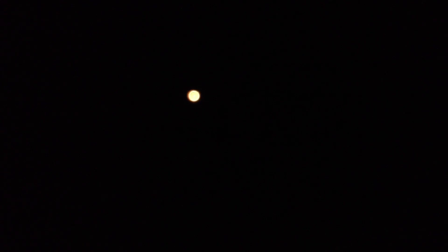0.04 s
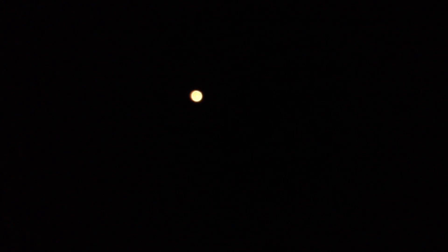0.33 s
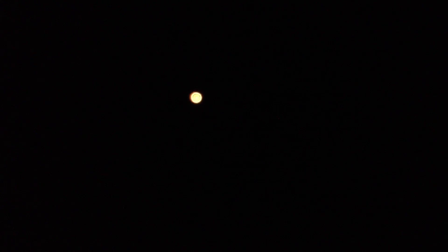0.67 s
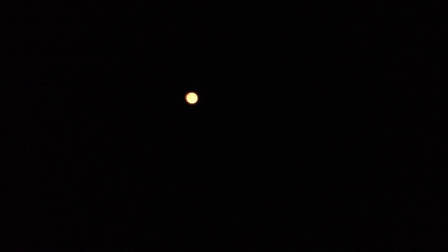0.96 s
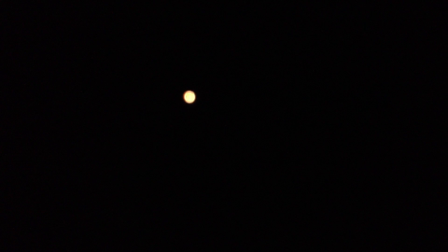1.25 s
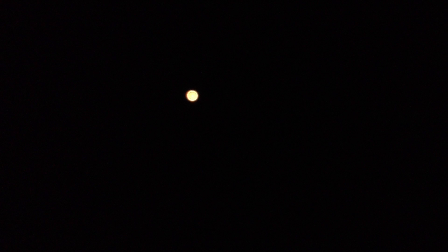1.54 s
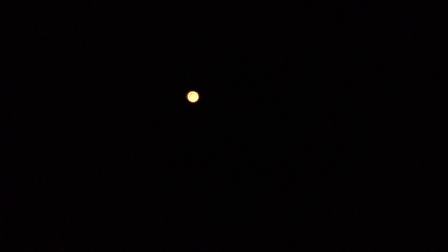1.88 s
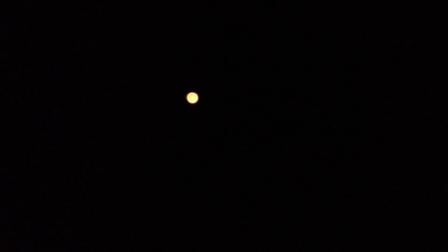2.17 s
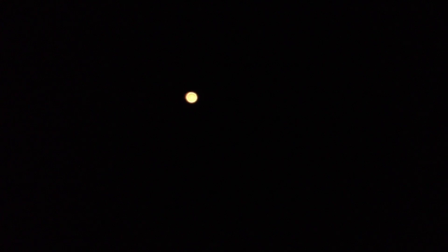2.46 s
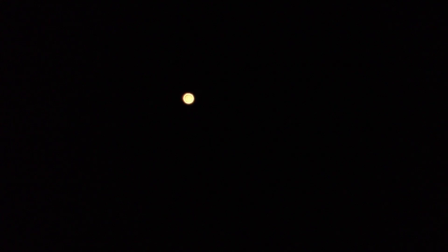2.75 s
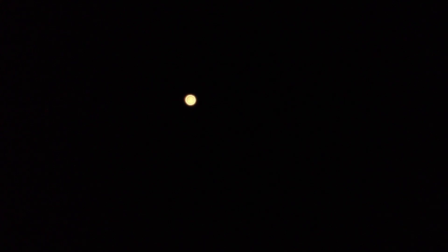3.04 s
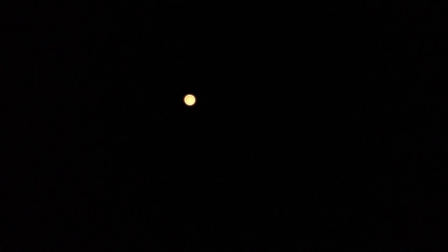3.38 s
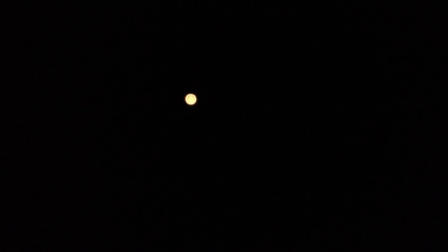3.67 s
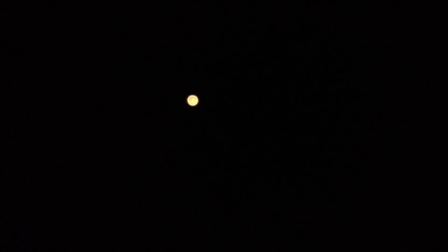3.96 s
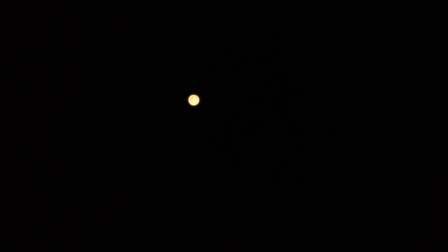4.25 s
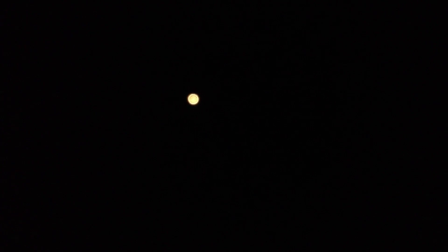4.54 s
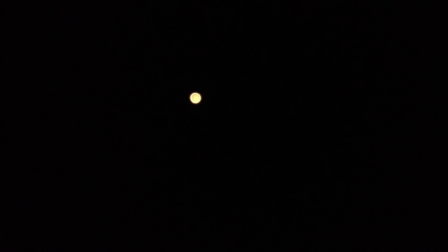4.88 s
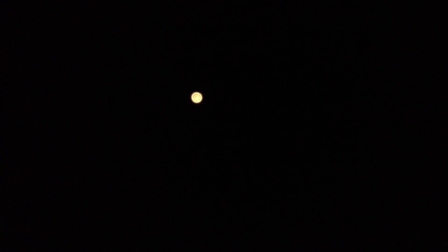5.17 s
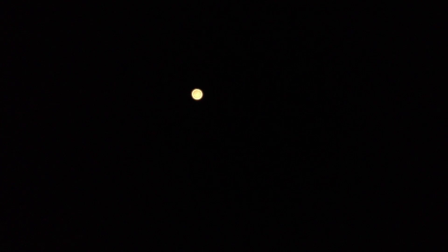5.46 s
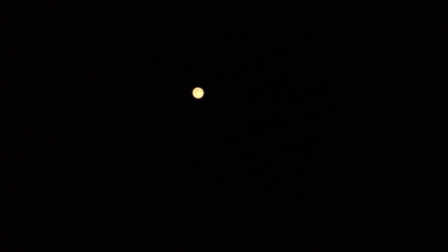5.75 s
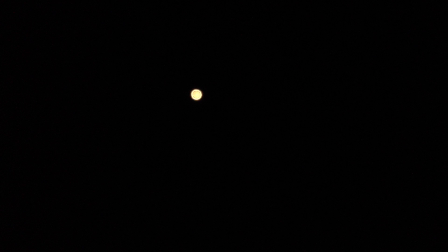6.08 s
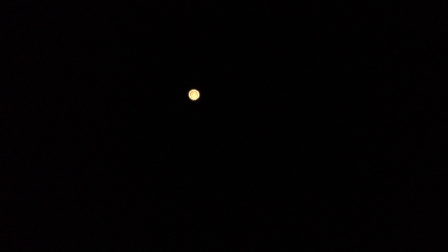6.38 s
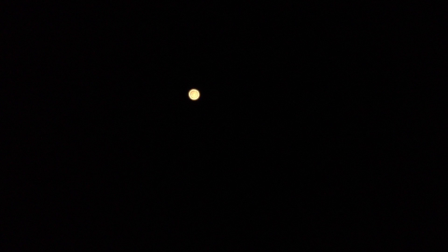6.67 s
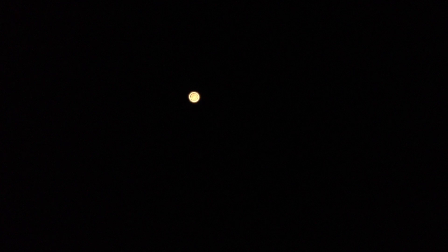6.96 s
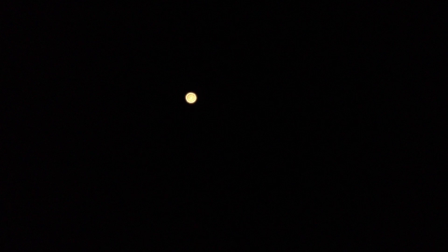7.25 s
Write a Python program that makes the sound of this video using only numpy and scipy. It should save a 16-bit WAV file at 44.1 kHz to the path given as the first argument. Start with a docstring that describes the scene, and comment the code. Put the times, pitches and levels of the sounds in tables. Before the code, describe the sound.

Dull, irregular knocks and low rubbing from a hand gripping the camera sit close on the microphone throughout. Behind them, a distant engine throbs faintly and crickets chirp very softly in the night air. From about four seconds a car approaches, its tyres roaring and hissing on asphalt. It rushes past a little after six seconds, drops in pitch and starts to roll away.

```python
"""A car passing at night.

Crickets chirp and a far engine throbs in the murmur of the night air. The hand on the camera sticks and
slips, sending dull knocks through its case. A car comes up a straight road at a steady speed, its tyres
roaring and hissing on the asphalt. Screened now and then by the roadside, it rushes past and rolls away."""
import sys
import numpy as np
from scipy import signal
from scipy.fft import rfft, irfft
from scipy.io import wavfile

SR = 44100
rng = np.random.default_rng(int(sys.argv[2]) if len(sys.argv) > 2 else 0)


def persist_wave(psi):
    """Save psi, clipped to +-1, as 16-bit WAV."""
    counts = np.round(np.clip(psi, -1, 1) * 32767).astype(np.int16)
    wavfile.write(sys.argv[1], SR, np.atleast_2d(counts).T)


N = 331632
TIME = np.arange(N) / SR
PASS_S, SPEED_M_PER_S, ROAD_DISTANCE_M, SOUND_M_PER_S = 6.28, 20.25, 7.5, 343

# Running of the far engine. Each row: time in seconds, level in dB, throb depth from 0 to 1.
FAR_ENGINE = [(0, -58, 0.6), (.4, -61, 0.8), (1.1, -57, 0.67), (1.7, -56.5, 0.6), (2.1, -56, .2),
              (2.6, -62.5, 0.3), (3.1, -60.5, .4), (4.5, -61, 0)]
# Firm knocks of the grip. Each row: peak time in seconds, peak in dB, brightness in dB per octave.
GRIP_KNOCKS = [(0.053, -28, 0), (0.119, -26.5, -2), (0.1758, -28.5, -1), (0.2758, -23, 6),
               (0.3341, -21.5, 1.5), (.435, -29, -0.5), (.453, -26, 1), (0.5272, -27.5, -1),
               (.557, -26.5, 4), (0.568, -24.5, 2.5), (0.585, -23, 4), (0.6148, -23, 4.5),
               (0.7034, -26.5, -1.5), (0.743, -24.5, -3), (.794, -27.5, -3), (.831, -22, -2),
               (0.9091, -25.5, -7.5), (1.025, -23, -3.5), (1.1728, -25.5, -2.5), (1.212, -27.5, -1),
               (1.288, -27.5, -1.5), (1.3855, -23, -5.5), (1.4628, -21, -8), (1.5053, -26, -4),
               (1.566, -27, -2.5), (1.602, -26, -6.5), (1.653, -18, -2.5), (1.7072, -22.5, -3),
               (1.7965, -22.5, -2), (1.9268, -23, 2), (1.954, -27, 1), (2.03, -28, 0), (2.1645, -26.5, 7.5),
               (2.1951, -17.5, 7), (2.302, -24, 7.5), (2.336, -23, 4.5), (2.398, -26.5, 3.5),
               (2.4466, -26, 2), (2.513, -29, 2), (2.5608, -22, 2.5), (2.6234, -26, -4), (3.0046, -25, 3),
               (3.0664, -23.5, -3), (3.2981, -28.5, -6), (3.3556, -24.5, -2), (3.5563, -21.5, 4),
               (3.588, -24.5, -2), (3.604, -26, -0.5), (3.693, -25.5, 1), (3.74, -27.5, -2),
               (3.765, -27.5, -4), (3.82, -27.5, -2), (3.834, -27, -2), (3.911, -28, -0.5),
               (3.9614, -21.5, 0), (4, -28, -0.5), (4.0216, -25, 0), (4.0455, -26, 4.5), (4.065, -25, -0.5),
               (4.1919, -27.5, -3), (4.259, -27.5, 2.5), (4.346, -31.5, 2), (4.4237, -25.5, 7),
               (4.487, -27, 7.5), (4.518, -26, 7.5), (4.585, -27.5, 2.5), (4.69, -27.5, 2),
               (4.749, -26, 5.5), (5.065, -27, -2.5), (5.1573, -25.5, .5), (5.2399, -27.5, -2),
               (5.578, -23.5, -1.5), (5.63, -27.5, -3), (5.734, -29, -3), (5.777, -29.5, -3),
               (5.977, -22, -3), (6.6204, -27, -0.5), (6.6889, -27, 0.5), (6.811, -27, 0.5), (7.02, -21, 3),
               (7.2049, -26, -3.5), (7.321, -29.5, 2.5), (7.39, -26, 2.5), (7.448, -25, -1)]


def gain_of(db):
    return 10 ** (np.asarray(db) / 20)


def unit_rms(x):
    return x / np.sqrt(np.mean(x ** 2) + 1e-20)


def spectrum_db(colour, hz):
    """Interpolate a colour over log frequency. Each row: frequency in Hz, relative level in dB."""
    f, db = np.transpose(colour)
    return np.interp(np.log(hz + 1), np.log(f + 1), db)


def follow(rows, column=1):
    """One column of a time curve at every sample."""
    rows = np.array(rows)
    return np.interp(TIME, rows[:, 0], rows[:, column])


def add(mix, start_s, sound):
    part = mix[max(round(start_s * SR), 0):][:len(sound)]
    part += sound[:len(part)]


def swell(start_s, length_s):
    """Half-sine envelope."""
    return np.sin(np.pi * np.clip((TIME - start_s) / length_s, 0, 1))


def drift(hz, size=N // 16):
    """Random wander of rms 1, up to about the given rate."""
    f = np.arange(size // 2 + 1) * SR / N
    coarse = irfft(rfft(rng.standard_normal(size)) * np.exp(-(f / hz) ** 2), size)
    return unit_rms(np.interp(np.arange(N), np.linspace(0, N, size), coarse))


def noise(colour):
    """Coloured noise of rms 1."""
    f = np.fft.rfftfreq(N, 1 / SR)
    return unit_rms(irfft(rfft(rng.standard_normal(N)) * gain_of(spectrum_db(colour, f)), N))


def tone(hz, waver, rough):
    """Sine of rms 1 with wavering pitch and rough amplitude."""
    turns = np.cumsum(hz * (1 + waver * drift(45))) / SR
    return np.sqrt(2) * np.sin(2 * np.pi * turns) * unit_rms(1 + rough * drift(120))


def air(air_db=-53, swell_db=1.8, hiss_db=-73):
    """Night air murmurs and swells slightly over the microphone's even hiss."""
    # Noise spectra. Each row: frequency in Hz, relative level in dB.
    air_colour = [(20, -26), (45, -10), (70, 2.5), (110, 9.5), (300, 0), (560, -0.5), (720, -4.5),
                  (1000, -12.5), (1600, -16.5), (3000, -26.5), (6500, -42.5), (15500, -62)]
    mic_colour = [(1000, -1.5), (4500, 2), (7500, 0), (9000, -3.5), (10200, -6), (12500, -0.5), (15500, -2)]
    murmur = gain_of(air_db + swell_db * drift(7.5)) * noise(air_colour)
    return murmur + gain_of(hiss_db) * noise(mic_colour)


def crickets(pip_s=.064, pip_period_s=.097, blur=0.28, echo=.3, echo_s=.03):
    """Trains of pips, softened by echoes from the grass, over a far trill, soft rasps in the verge and one
    brief scuff."""
    # Each row: first pip's centre in seconds, pitch in Hz, level in dB, number of pips.
    chirps = [(.2, 4750, -76, 2), (.365, 4480, -80, 2), (.7, 4595, -75.5, 3), (.72, 4910, -80, 2),
              (.85, 4715, -80, 2), (1.37, 4920, -82, 3), (1.405, 4595, -79, 3), (1.45, 4715, -77.5, 2),
              (2.12, 4595, -77, 2), (2.675, 4595, -76, 3), (2.705, 4715, -78, 2), (3.31, 4715, -78, 1),
              (3.484, 4590, -73.5, 3), (3.61, 4500, -74.5, 1), (3.95, 4715, -76, 1), (4.21, 4595, -74, 3),
              (4.62, 4715, -77, 2)]
    # Far crickets. Each row: time in seconds, pitch in Hz, level in dB.
    trill_curve = [(0, 4900, -93), (1.2, 4930, -91), (1.5, 4935, -86), (1.72, 4940, -94), (1.87, 4950, -86),
                   (2.15, 4950, -93), (2.48, 4975, -87), (2.8, 4950, -96), (4, 4950, -104)]
    # Each row: start in seconds, length in seconds, peak level in dB. The short row at 6.055 s is a brief scuff
    # beside a snap.
    rasps = [(1.93, 0.46, -73.5), (6.055, .045, -61), (7.08, 0.18, -73)]
    t, pips = np.arange(0, pip_s, 1 / SR), np.zeros(N)
    for s, hz, db, count in chirps:
        pip = gain_of(db) * np.hanning(len(t)) * np.sin(2 * np.pi * hz * t)
        for k in range(count):
            add(pips, s + k * pip_period_s - pip_s / 2, pip)
    tail = rng.standard_normal(SR // 2) * np.exp(-TIME[:SR // 2] / echo_s)
    pips += echo * signal.oaconvolve(pips, tail / np.linalg.norm(tail))[:N]
    trill = gain_of(follow(trill_curve, column=2)) * tone(follow(trill_curve), waver=.003, rough=.7)
    rasp_colour = [(3000, -19), (3850, -5), (4100, -11), (4500, -2), (5500, -12), (7400, -12), (9000, -24)]
    rasp = sum(gain_of(db) * swell(s, length_s) for s, length_s, db in rasps) * noise(rasp_colour)
    return pips * unit_rms(1 + blur * drift(80)) + trill + rasp


def whistles(fade_power=0.37, arch_power=.7):
    """Thin whistles, each gliding between two pitches, straight or along an arch."""
    # Each row: start and length in seconds, start pitch, end pitch and arch height in Hz, level in dB.
    glides = [(2.3, .09, 5600, 6850, 0, -79), (2.368, .035, 5520, 5660, 0, -73.5),
              (7.17, .38, 1490, 1492, 185, -59.5)]
    out = np.zeros(N)
    for s, length_s, start_hz, end_hz, arch_hz, db in glides:
        arch = swell(s, length_s)
        hz = np.interp(TIME, [s, s + length_s], [start_hz, end_hz]) + arch_hz * arch ** arch_power
        out += gain_of(db) * arch ** fade_power * tone(hz, waver=.0046, rough=0.28)
    return out


def ticks(decay_s=0.0035, width_octaves=0.56):
    """Tiny dry snaps nearby, each a fast-decaying noise band."""
    # Each row: start in seconds, initial level in dB, band centre in Hz.
    snaps = [(.897, -60, 5400), (3.162, -61, 3200), (3.437, -67.5, 7200), (6.072, -63, 6800)]
    t, out = np.arange(SR // 20) / SR, np.zeros(N)
    f = np.fft.rfftfreq(len(t), 1 / SR)
    for s, db, hz in snaps:
        band = np.exp(-(np.log2((f + 1) / hz) / width_octaves) ** 2 / 2)
        snap = unit_rms(irfft(rfft(rng.standard_normal(len(t))) * band, len(t)))
        add(out, s, gain_of(db) * snap * np.exp(-t / decay_s))
    return out


def engine_clatter(firing_hz=16.5, first_beat_s=0.032, sharpness=1.04):
    """Each firing of the far engine sends a puff of noise through its housing."""
    # Housing resonances. Each row: frequency in Hz, width in Hz, relative level in dB.
    modes = [(593, 61, 3.5), (900, 38, 1), (1059, 75, -3), (1230, 35, -3.5), (1465, 63, -3.5),
             (1798, 99, -10), (2113, 135, -13.5), (2410, 180, -15.5)]
    beat = unit_rms(np.exp(sharpness * np.cos(2 * np.pi * firing_hz * (TIME - first_beat_s))))
    depth = follow(FAR_ENGINE, column=2)
    puffs = (1 - depth + depth * beat) * rng.standard_normal(N)
    f = np.fft.rfftfreq(N, 1 / SR)
    housing = sum(gain_of(db) / (1 + 1j * (f - hz) / width_hz) ** 2 for hz, width_hz, db in modes)
    return gain_of(follow(FAR_ENGINE)) * unit_rms(irfft(rfft(puffs) * housing, N))


def engine_hum(hz=74.8, offset_db=-4, fade_db_per_s=0.5):
    """The far engine's deep hum follows the level of its clatter and slowly fades."""
    level_db = follow(FAR_ENGINE) + offset_db - fade_db_per_s * TIME
    return gain_of(level_db) * tone(hz, waver=0.034, rough=.15)


def sleeve(grain_db=2):
    """Cloth slides with a fine, bright grain."""
    # Each row: start in seconds, length in seconds, peak level in dB.
    brushes = [(-.2, .45, -72.5), (.28, 0.39, -72.5), (.55, 0.2, -69.5)]
    colour = [(1500, -18), (4000, -2), (7000, 0.5), (10000, -2.5), (15000, 0.5)]
    envelope = sum(gain_of(db) * swell(s, length_s) for s, length_s, db in brushes)
    return envelope * gain_of(grain_db * drift(200)) * noise(colour)


def case_ring(tilt_db_per_octave, pivot_hz=199, size=8192):
    """The camera case's ring after one push, and its peak delay in seconds. Quicker pushes are brighter."""
    # Case response. Each row: frequency in Hz, relative level in dB.
    case_colour = [(20, -56.5), (45, -30.5), (74, -18.5), (93, -29.5), (115, -21.5), (142, -4), (165, 0.5),
                   (215, -3), (265, -9), (298, -29), (345, -20.5), (410, -29.5), (600, -46), (5000, -140)]
    f = abs(np.fft.fftfreq(size, 1 / SR))
    db = spectrum_db(case_colour, f) + tilt_db_per_octave * np.clip(np.log2((f + 1) / pivot_hz), -1, 2)
    minimum_phase = np.exp(np.conj(signal.hilbert(db * np.log(10) / 20)))
    ring = np.fft.ifft(minimum_phase).real[:size // 2]
    envelope = abs(signal.hilbert(ring))
    return ring / envelope.max(), envelope.argmax() / SR


def finger_slips(per_s=22, jitter=.3, relative_db=8.5, spread_db=3.5, pause_s=.022):
    """Light slips ring the case at a loose beat and pause around each firm knock."""
    gaps, sizes = rng.standard_normal((300, 2)).T
    slip_times = np.cumsum(np.exp(jitter * gaps)) / per_s
    knock_times = np.array(GRIP_KNOCKS)[:, 0]
    ring, _ = case_ring(tilt_db_per_octave=-1.6)
    out = np.zeros(N)
    for s, size in zip(slip_times, np.minimum(sizes, 0.63)):
        if abs(knock_times - s).min() > pause_s:
            add(out, s, gain_of(relative_db + spread_db * size) * ring)
    return out


def grip(tremors_per_s=220, tremor_offset_db=-1):
    """Stick and slip of the hand: firm knocks, light slips and dense tremor, all through the case."""
    # Unrest of the hand. Each row: time in seconds, gain of tremor and slips in dB.
    unrest = [(0, -43), (.6, -39), (2.4, -39), (2.8, -41.5), (3.7, -39.5), (4.9, -41), (5.5, -40),
              (6.2, -45), (6.8, -39.5), (7.5, -43)]
    knocks = np.zeros(N)
    for s, db, tilt in GRIP_KNOCKS:
        ring, delay_s = case_ring(tilt)
        add(knocks, s - delay_s, gain_of(db) * ring)
    pushes = (rng.random(N) < tremors_per_s / SR) * gain_of(rng.uniform(-5.4, 2, N))
    ring, _ = case_ring(tilt_db_per_octave=-1.3)
    tremor = unit_rms(signal.oaconvolve(pushes - pushes.mean(), ring)[:N])
    return knocks + gain_of(follow(unrest)) * (gain_of(tremor_offset_db) * tremor + finger_slips())


def car_place(behind_m=0):
    """Distance in metres of a point behind the car's middle, and its facing: 1 coming, -1 going."""
    along_m = SPEED_M_PER_S * (PASS_S - TIME) + behind_m
    distance_m = np.hypot(ROAD_DISTANCE_M, along_m)
    return distance_m, along_m / distance_m


def pass_gain(db, forward_db, screened, loss_db_per_m=0, behind_m=0, near_s=4.21, emerge_db_per_s=7.5):
    """Gain of one part of the car: spreading, beaming, screening, path loss and a fade-in until near."""
    # Roadside screening. Each row: time in seconds, loss in dB at screened=1.
    screen = [(4, .5), (4.75, 1.5), (5.24, 0.5), (5.57, 0.9), (5.8, 5), (6.02, 7), (6.17, 5.5), (6.36, 1.5),
              (6.53, 3.5), (6.68, 9.5), (7, 5.5), (7.18, 1.5), (7.52, -1)]
    distance_m, facing = car_place(behind_m)
    lost_db = screened * follow(screen) + loss_db_per_m * (distance_m - ROAD_DISTANCE_M)
    lost_db += emerge_db_per_s * np.maximum(near_s - TIME, 0)
    return ROAD_DISTANCE_M / distance_m * gain_of(db + forward_db * facing - lost_db)


def doppler_shift(sound, ratio):
    """Resample: higher as the car comes, lower as it goes."""
    return np.interp(np.cumsum(ratio) % N, np.arange(N), sound)


def exhaust(pipe_hz=138, width_hz=18):
    """Soft, unsteady drone of the tailpipe, beamed backwards."""
    gain = pass_gain(db=-48, forward_db=-7, screened=0, loss_db_per_m=-0.5)
    return gain * unit_rms(drift(width_hz) * np.sin(2 * np.pi * pipe_hz * TIME))


def squeals(fade_power=.4, halo_db=-6, rough=.6):
    """Bursts of thin, fluttering tone high above the tyre noise, each in a narrow hiss."""
    # Each row: start and length in seconds, start and end pitch in Hz, level in dB, fractional waver.
    bursts = [(4.13, .4, 9500, 8820, -86, .02), (4.84, .09, 8850, 8750, -79, .014),
              (4.94, .2, 8950, 8780, -81, .016), (5.15, .13, 8790, 8800, -77, .006),
              (5.31, .14, 8850, 8820, -78, .008), (5.52, .18, 8870, 8740, -72, .005),
              (7.12, .06, 8720, 8700, -80, .006)]
    halo = gain_of(halo_db) * noise([(8000, -45), (8600, -3), (8900, 0), (9300, -4), (9900, -45)])
    flutter = drift(45)
    strength = np.sqrt(2) * unit_rms(1 + rough * drift(100))
    out = np.zeros(N)
    for s, length_s, start_hz, end_hz, db, waver in bursts:
        on = (TIME > s) & (TIME < s + length_s)
        progress = (TIME[on] - s) / length_s
        turns = np.cumsum((start_hz + (end_hz - start_hz) * progress) * (1 + waver * flutter[on])) / SR
        envelope = gain_of(db) * abs(np.sin(np.pi * progress)) ** fade_power
        out[on] += envelope * (strength[on] * np.sin(2 * np.pi * turns) + halo[on])
    return out


def whoosh(relative_width=.36):
    """A band of road noise, reinforced by its ground echo, slides down as the car goes by."""
    # Each row: time in seconds, band centre in Hz, level in dB.
    sweep = [(6.1, 998, -77), (6.24, 961, -42), (6.4, 896.4, -34), (6.54, 720, -42), (6.68, 500, -46),
             (6.83, 299, -47), (6.93, 260, -70)]
    hz = follow(sweep)
    turns = np.cumsum(hz) / SR
    slowed_s = turns / hz.max()  # narrows the band as it sinks
    a, b = (np.interp(slowed_s, TIME, drift(relative_width * hz.max())) for _ in range(2))
    band = a * np.cos(2 * np.pi * turns) + b * np.sin(2 * np.pi * turns)
    on = (TIME > sweep[0][0]) & (TIME < sweep[-1][0])
    return on * gain_of(follow(sweep, column=2)) * band


def tyres(flutter_db=0.48, grit_db=0.56, note_rise_s=0.13):
    """Tyres on asphalt: low rush, road roar, tread noise and hiss, unsteady in the moving air."""
    # Noise spectra. Each row: frequency in Hz, relative level in dB.
    rush_colour = [(85, -43), (150, 3.5), (280, 2), (420, -1), (560, -6), (900, -57)]
    roar_colour = [(250, -35.5), (420, -7), (520, -1), (760, 3), (950, 1.5), (1150, -3.5), (1500, -34),
                   (3000, -61)]
    tread_colour = [(670, -27.5), (970, -3.5), (1170, -0.5), (1400, -2), (1630, -11), (2020, -19.5),
                    (3850, -50.5)]
    hiss_colour = [(1000, -16.5), (1800, 2), (2400, -1), (3300, -7), (4800, -13), (6000, -19.5),
                   (8000, -22.5), (10000, -31), (15000, -35)]
    horn_colour = [(1800, -20), (2700, -4), (3500, 0), (4600, -5), (7000, -28)]
    # Tones the tread sings forwards. Each row: start in seconds, unshifted pitch in Hz, relative dB.
    tread_notes = [(4.38, 680, -3.5), (3.9, 1300, -10.5)]
    # The treble dips just before the pass, then opens. Each row: time in seconds, loss in dB.
    treble_dip = [(4.8, 1), (5.72, -1.3), (6.03, 5.5), (6.11, 6), (6.16, -1.5), (6.35, -1.1), (6.5, -2),
                  (6.7, -1.5), (7.2, 0), (7.5, 3.5)]
    _, facing = car_place()
    ahead = np.maximum(facing, 0)
    doppler = 1 / (1 - facing * SPEED_M_PER_S / SOUND_M_PER_S)
    rush = noise(rush_colour)
    rush *= pass_gain(db=-38, forward_db=0, screened=0.17, loss_db_per_m=0.26, behind_m=1.3)
    roar = doppler_shift(noise(roar_colour), doppler)
    roar *= pass_gain(db=-32, forward_db=0.3, screened=0.74, loss_db_per_m=0.1, behind_m=0.87)
    hiss = noise(hiss_colour) * pass_gain(db=-45, forward_db=4, screened=1.02, loss_db_per_m=0.32)
    fizz = noise([(3000, -13), (6000, 6), (15000, -2)])
    fizz *= pass_gain(db=-62.8, forward_db=4, screened=1.3, loss_db_per_m=0.5)
    notes = np.zeros(N)
    for s, hz, db in tread_notes:
        rise = np.clip((TIME - s) / note_rise_s, 0, 1)
        notes += rise * gain_of(db) * tone(hz * doppler, waver=.005, rough=0.35)
    tread = doppler_shift(noise(tread_colour), doppler) + ahead ** 2 * notes
    tread *= pass_gain(db=-39.5, forward_db=2, screened=0.59)
    # The wedge between tyre and road beams hiss ahead like a horn.
    horn = ahead * noise(horn_colour) * pass_gain(db=-66, forward_db=3, screened=1)
    treble = (hiss + fizz + horn) * gain_of(grit_db * drift(150) - follow(treble_dip))
    return (rush + roar + tread + treble) * gain_of(flutter_db * drift(21))


def scene():
    """Mono mix of car, handling, far engine and small night sounds."""
    car = tyres() + whoosh() + exhaust() + squeals()
    mix = car + grip() + engine_clatter() + engine_hum()
    return (mix + crickets() + whistles() + ticks() + air() + sleeve())[None]


def record(dry):
    """The camera's band limit."""
    cutoff_hz = 15350
    lowpass = signal.firwin(511, cutoff_hz, window=("kaiser", 9), fs=SR)
    return signal.oaconvolve(dry, lowpass[None], "same")


dry = scene()
out = record(dry)
persist_wave(out)
```